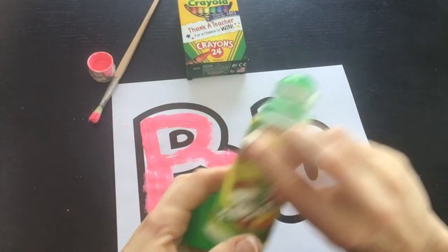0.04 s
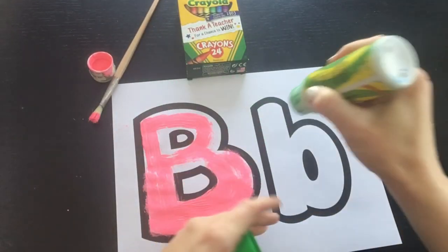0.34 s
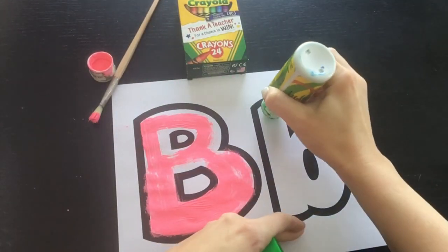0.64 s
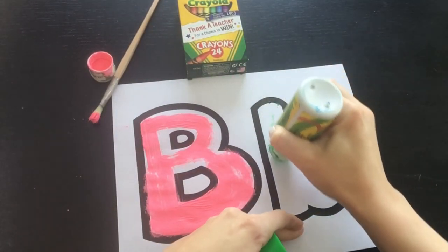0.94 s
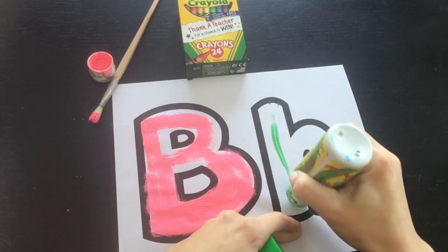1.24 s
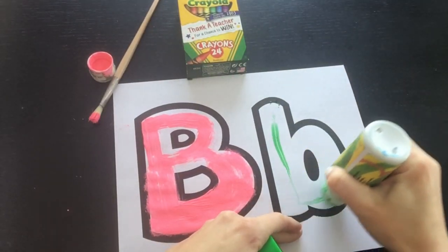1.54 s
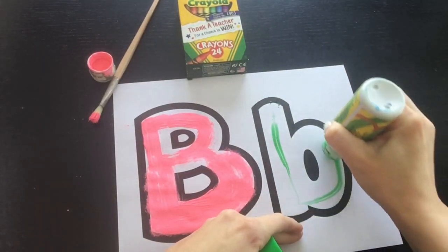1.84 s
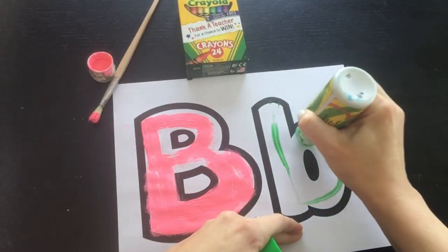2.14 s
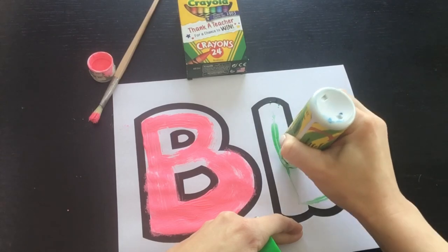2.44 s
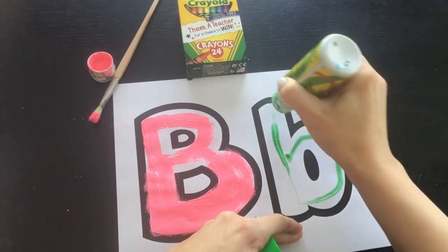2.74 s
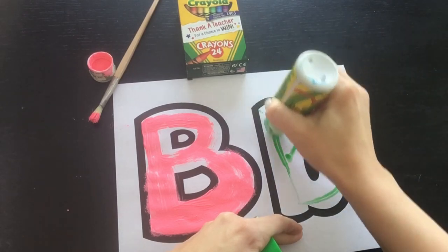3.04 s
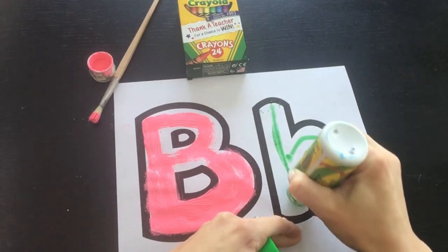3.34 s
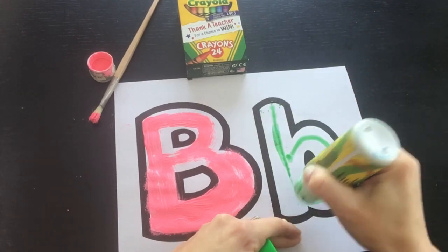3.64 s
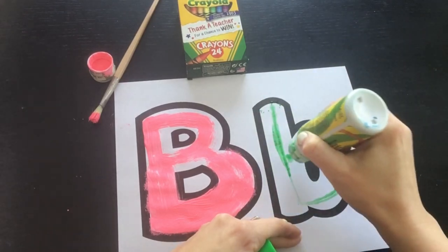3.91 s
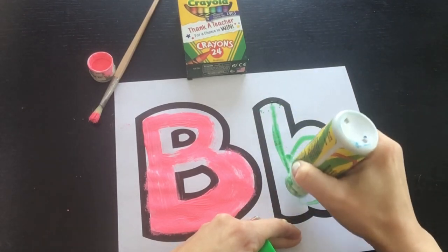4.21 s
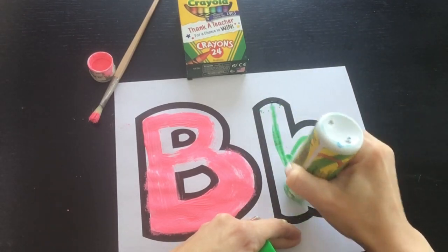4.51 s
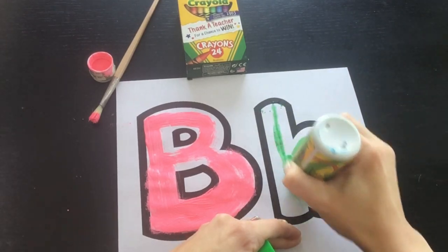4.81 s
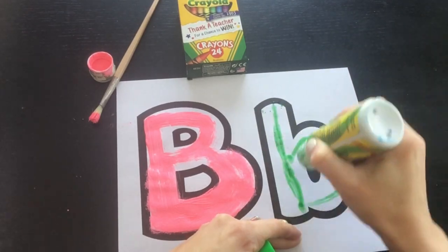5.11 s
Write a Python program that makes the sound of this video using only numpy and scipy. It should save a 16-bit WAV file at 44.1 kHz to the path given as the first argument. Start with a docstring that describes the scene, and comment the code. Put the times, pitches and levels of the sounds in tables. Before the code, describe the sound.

Fingers rub and click on a plastic paint bottle, then its roller tip knocks sharply on paper lying on a table. The tip is drawn along in soft, hissing, rasping strokes, with brief squeaks and small wet smacks as it lifts. Two more knocks come between the strokes, each ringing briefly through bottle and tabletop. It all sounds close, in a small room with a low hum.

```python
"""A paint bottle with a roller tip is knocked three times on paper on a table and drawn along in strokes. Each
knock makes the bottle and table ring. In the strokes, paper fibres catch on the tip: the paper hisses and
rasps, the hollow tip rings near 1 kHz and the tabletop drums faintly. The tip squeaks as it sticks and slips,
and its wet paint smacks as it lifts. At the start, fingers rub the bottle as they turn it over. Plastic, paper
and the wet tip click now and then, all in a small room with a low hum."""
import sys
import numpy as np
from scipy import signal
from scipy.fft import rfft, irfft
from scipy.io import wavfile

SR = 44100
rng = np.random.default_rng(int(sys.argv[2]) if len(sys.argv) > 2 else 0)


def log_audio(samples):
    """Write samples as a 16-bit WAV file to the path given in sys.argv[1]."""
    # one column per channel
    frames = np.atleast_2d(samples).T
    # limit to full scale, then quantise
    limited = np.clip(frames, -1, 1)
    pcm = np.round(limited * 32767).astype(np.int16)
    wavfile.write(sys.argv[1], SR, pcm)


N = 236442
TIME = np.arange(N) / SR


def from_db(db):
    """Turns decibels into a factor to multiply a sound by."""
    return 10 ** (np.asarray(db) / 20)


def rms_one(x):
    """Scales a sound to an average strength (rms) of 1."""
    return x / np.sqrt(np.mean(x ** 2) + 1e-20)


def at_hz(points, hz):
    """Reads between the rows of a table, giving each octave equal space."""
    known_hz, values = np.transpose(points)
    return np.interp(np.log(np.maximum(hz, 1)), np.log(known_hz), values)


def butter(x, hz, kind, order=2):
    """A filter that keeps the lows, the highs or a band."""
    sections = signal.butter(order, np.minimum(hz, SR / 2 - 100), kind, fs=SR, output="sos")
    return signal.sosfilt(sections, x + 1e-18)


def colour(x, spectrum):
    """Shapes a sound's bass and treble from rows of (pitch_hz, level_db); strength 1."""
    gains = from_db(at_hz(spectrum, np.arange(N // 2 + 1) * SR / N))
    return rms_one(irfft(rfft(x) * gains, N))


def drift(rate_hz):
    """A smooth random wander of strength 1."""
    return rms_one(butter(rng.standard_normal(N + SR), rate_hz, "low")[SR:])


def resonance(x, hz, width_hz):
    """Lets through what lies near one pitch and weakens the rest."""
    r = np.exp(-np.pi * width_hz / SR)
    feedback = [1, -2 * r * np.cos(2 * np.pi * hz / SR), r * r]
    return signal.lfilter(np.array([1, 0, -1]) * (1 - r * r) / 2, feedback, x)


def gliding_band(centre_hz, width_hz):
    """Noise gathered around a pitch that can move; strength 1."""
    a, b = butter(rng.standard_normal((2, len(centre_hz))), width_hz / 2, "low")
    phase = 2 * np.pi * np.cumsum(centre_hz) / SR
    return rms_one(a * np.cos(phase) + b * np.sin(phase))


def fibres(per_s, spread_db):
    """Tiny slips over a rough surface: random clicks of uneven size."""
    return (rng.random(N) < per_s / SR) * rng.standard_normal(N) * from_db(spread_db * drift(250))


def shifting(x, spread_db, rate_hz):
    """The changing gap between hand, tip and paper lets narrow bands swell and fade, each on its own."""
    spectrum, hz = rfft(x), np.arange(N // 2 + 1) * SR / N
    centres = np.linspace(0, 16000, 25)
    shares = (np.maximum(1 - np.abs(hz - centre) / centres[1], 0) for centre in centres)
    bands = (irfft(spectrum * share, N) for share in shares)
    return rms_one(sum(band * from_db(spread_db * drift(rate_hz)) for band in bands))


def swell(length_s):
    """A rounded rise and fall."""
    return np.sqrt(np.hanning(int(length_s * SR)))


def humps(rows):
    """A level that swells and fades once for each row of (middle_s, length_s, level_db)."""
    return sum(from_db(db) * np.exp(-(2 * (TIME - s) / length) ** 2) for s, length, db in rows)


def add(out, s, sound):
    """Mixes a sound in, starting at s seconds."""
    start = int(round(s * SR))
    out[start:start + len(sound)] += sound[:N - start]


def background(air_db=-50.5, draught_db=-39.5, draught_hz=6.5):
    """Room air, mains hum and a slow draught on the microphone."""
    # the tones of the hum: pitch_hz, level_db
    hum_tones = [(60, -68.5), (120, -70)]
    # the soft rush of the air: pitch_hz, level_db
    air_spectrum = [(10, 5.5), (34, 3.5), (50, -8), (85, -13.5), (160, -26.5), (200, -16), (260, -25),
                    (340, -17.5), (500, -27), (800, -30), (2000, -42.5), (4000, -46), (9500, -46),
                    (15700, -59.5)]
    hum = sum(np.sqrt(2) * from_db(db) * np.sin(2 * np.pi * hz * TIME) for hz, db in hum_tones)
    draught = from_db(draught_db) * rms_one(butter(drift(draught_hz), 20, "low"))
    return from_db(air_db) * colour(rng.standard_normal(N), air_spectrum) + hum + draught


def room(x, delay_s=0.0046):
    """The room sends back dense echoes that last longest in the bass."""
    # how long the room rings: pitch_hz, decay_s (here and below, the time to fall by 60 dB)
    decay_times = [(150, 0.6), (500, .36), (1200, .34), (2500, 0.41), (5000, 0.14), (10000, 0.35)]
    t = TIME[:SR * 3 // 4]
    edges_hz = np.geomspace(90, 16000, 9)
    echoes = np.zeros(len(t))
    for low, high in zip(edges_hz, edges_hz[1:]):
        band = butter(rng.standard_normal(len(t)), [low, high], "band")
        echoes += band * from_db(-60 * t / at_hz(decay_times, np.sqrt(low * high)))
    echoes *= t > delay_s
    return signal.fftconvolve(x, echoes / np.sqrt(np.sum(echoes ** 2)))[:N]


def holding_hand(pitch_hz=620, width_hz=550):
    """The side of the free hand brushes dully on to the paper to hold it."""
    # the hand's slide: middle_s, length_s, level_db
    slides = [(0.58, 0.15, -56.5)]
    return humps(slides) * gliding_band(np.full(N, pitch_hz), width_hz)


def grip(gain_db=1.5):
    """Skin brushes over the plastic as the bottle is turned."""
    # short rubs of the fingers: middle_s, length_s, level_db
    rubs = [(0.0, 0.037, -61), (0.11, 0.14, -66), (0.215, 0.056, -62), (0.325, 0.12, -64.5),
            (0.42, 0.077, -55.5), (0.575, 0.19, -62)]
    # skin on plastic: pitch_hz, level_db
    skin_spectrum = [(1200, -17), (3400, -11.5), (5000, -9), (6800, -10), (8700, -9.5), (10200, -10),
                     (11300, -23.5), (15700, -37.5)]
    rustle = colour(fibres(per_s=13000, spread_db=1.0), skin_spectrum)
    return from_db(gain_db) * humps(rubs) * shifting(rustle, spread_db=4.0, rate_hz=3.5)


def ticks(gain_db=-2.5, decay_s=0.01, width_share=0.95):
    """Plastic and paper snap, and the wet tip ticks as it leaves the paper: each click is a broad burst of
    noise that dies quickly."""
    # the clicks: start_s, level_db, pitch_hz
    clicks = [(0.170, -47, 4500), (0.194, -52, 3500), (0.269, -47, 10500), (0.2785, -38.5, 6900),
              (0.3235, -41, 6840), (0.3320, -36, 5700), (0.3936, -36.5, 3280), (0.467, -42, 4800),
              (0.7014, -28.5, 2000), (0.955, -41, 5660), (1.44, -51, 4500), (1.92, -42, 1000),
              (4.221, -55.5, 9450), (5.077, -53, 6900)]
    out, t = np.zeros(N), TIME[:SR // 8]
    for s, db, hz in clicks:
        width_hz = width_share * hz
        burst = resonance(rng.standard_normal(len(t)), hz, width_hz)
        burst = rms_one(butter(burst, hz + width_hz, "low"))   # a softer contact has less treble
        add(out, s, burst * from_db(gain_db + db - 60 * t / decay_s))
    return out


def squeaks(base_width_hz=120, width_share=0.1):
    """The tip sticks and slips, making brief rough whistles that swell and glide."""
    # the whistles: start_s, length_s, start_hz, end_hz, level_db
    whistles = [(0.403, 0.026, 4900, 4380, -45.5), (1.453, 0.16, 2650, 3050, -59.5),
                (1.589, 0.086, 4050, 4260, -49), (1.651, 0.045, 929, 580, -51),
                (1.677, 0.055, 662, 958, -53), (1.711, 0.1, 4300, 4530, -53.5),
                (1.82, 0.072, 4400, 4500, -49.5), (2.086, 0.18, 2955, 2760, -62.5),
                (2.936, 0.062, 5950, 5550, -57), (3.148, 0.11, 6040, 5760, -54),
                (3.185, 0.33, 3480, 4705, -54.5), (4.563, .08, 6660, 6640, -64),
                (4.656, 0.066, 3850, 4150, -55), (4.553, .08, 2620, 2620, -61),
                (4.672, .05, 2900, 2780, -59), (4.791, .022, 928, 1004, -55), (4.80, 0.19, 2650, 2600, -60),
                (4.83, .13, 4200, 4050, -58)]
    out = np.zeros(N)
    for s, length, start_hz, end_hz, db in whistles:
        shape = swell(length)
        pitch_hz = np.linspace(start_hz, end_hz, len(shape))
        width_hz = base_width_hz + width_share * start_hz
        add(out, s, from_db(db) * shape * gliding_band(pitch_hz, width_hz))
    return out


def lifts(peel_s=0.034, let_go_s=0.0345, smack_decay_s=0.02, smack_top_hz=4500, pop_hz=362, pop_s=0.09):
    """Sticky paint peels, then parts with a duller smack and a soft low pop."""
    # the tip leaves the paper: time_s, peel_db, smack_db, pop_db
    lift_offs = [(2.578, -57, -42, -53), (3.639, -48.5, -43, -55), (5.043, -55.5, -64.5, -64)]
    # wet paint parting: pitch_hz, level_db
    wet_spectrum = [(200, -15.5), (500, -7.5), (850, 3), (1300, -10.5), (1900, -15.5), (2600, -8.5),
                    (3200, -23.5), (4400, -10), (6000, -22.5), (10000, -24), (15700, -50)]
    peel_level, smack_level, pop_level = np.zeros((3, N))
    t = TIME[:SR // 4]
    for s, peel_db, smack_db, pop_db in lift_offs:
        add(peel_level, s - peel_s / 4, from_db(peel_db) * swell(peel_s))
        add(smack_level, s + let_go_s, from_db(smack_db - 60 * t / smack_decay_s))
        add(pop_level, s - peel_s / 4, from_db(pop_db) * swell(pop_s))
    wet = colour(rng.standard_normal(N), wet_spectrum)
    smacks = butter(smack_level * wet, smack_top_hz, "low", order=1)
    pops = pop_level * gliding_band(np.full(N, pop_hz), width_hz=190)
    return peel_level * wet + smacks + pops


def table_drumming(level):
    """The tip's tiny slips shake the tabletop, harder where the tip judders."""
    # the judders: middle_s, length_s, level_db
    judders = [(1.03, 0.039, -57), (1.68, .05, -59.5), (3.21, 0.056, -55.5), (4.638, 0.028, -48),
               (4.9, 0.074, -52)]
    # the tabletop's low rumble: pitch_hz, level_db
    table_spectrum = [(70, -26.5), (130, 4.5), (200, -6.5), (300, 2), (450, -4), (620, -6.5), (850, -11),
                      (1400, -14.5), (3000, -38)]
    return (level + humps(judders)) * colour(fibres(per_s=3000, spread_db=1.5), table_spectrum)


def paper_hiss():
    """Paper fibres catch on the tip so often that their clicks blur into a hiss."""
    # rubbed paper: pitch_hz, level_db
    paper_spectrum = [(900, -15), (1400, -4), (1950, -10.5), (2250, -3), (2600, 0.5), (3300, -4), (4200, 0),
                      (5700, -4), (7500, -5.5), (10000, -9.5), (12000, -19.5), (15700, -34)]
    hiss = colour(fibres(per_s=14000, spread_db=-0.6), paper_spectrum)
    return shifting(hiss, spread_db=2.6, rate_hz=5)


def tip_ring(harder_db, pitch_hz=1051, hz_per_db=4, wander_hz=32, width_hz=155, halo_db=-7.0):
    """The hollow tip rings in a wider halo of noise; its pitch wanders and rises with pressure."""
    ring_hz = pitch_hz + hz_per_db * harder_db + wander_hz * drift(9.2)
    return gliding_band(ring_hz, width_hz) + from_db(halo_db) * gliding_band(ring_hz, 5 * width_hz)


def strokes(hiss_db=7.5, tip_db=-0.5, fade_s=0.011, tremble_db=0.73):
    """The tip crosses the paper: speed drives the hiss and rasp, pressure shakes the tip and table."""
    # the hand's movement, one list per stroke: time_s, speed_db, pressure_db (both as sound levels)
    hand_moves = [
        [(0.79, -81, -52.5), (0.812, -64, -52.5), (0.912, -68, -59), (0.99, -65.5, -48.5), (1.016, -67.5, -51),
         (1.174, -63, -51), (1.244, -70.5, -60), (1.358, -71.5, -60.5), (1.42, -84, -70)],
        [(1.44, -73, -75), (1.604, -59, -55), (1.708, -67, -61), (1.738, -66.5, -50.5), (1.812, -65.5, -55),
         (1.872, -67.5, -47.5), (1.898, -66, -60.5), (1.96, -66.5, -54.5), (2.06, -72.5, -65)],
        [(2.08, -73.5, -65.5), (2.124, -69, -65), (2.196, -69.5, -60), (2.246, -71.5, -63.5),
         (2.368, -66.5, -53), (2.392, -62, -55), (2.424, -65.5, -55.5), (2.474, -92, -72.5), (2.48, -96, -72)],
        [(3.01, -73, -52), (3.05, -62.5, -51), (3.17, -62, -53.5), (3.228, -60, -48), (3.378, -64, -58),
         (3.396, -63.5, -55), (3.47, -74.5, -64), (3.496, -70.5, -57.5), (3.6, -87.5, -82)],
        [(4.48, -77, -50.5), (4.498, -67, -55.5), (4.6, -61, -52.5), (4.646, -64, -58.5), (4.66, -61, -52.5),
         (4.676, -61.5, -55.5), (4.716, -75, -53), (4.736, -85, -71), (4.76, -88, -71.5)],
        [(4.797, -68, -54), (4.805, -63, -54.5), (4.819, -66, -53), (4.893, -62, -58), (4.951, -64.5, -53.5),
         (4.965, -68, -57.5), (5.02, -94, -72)],
    ]
    # what the tip's tilt gives in each stroke at usual speed and pressure: rasp_db, drum_db, rasp_hz
    tilts = [(-59, -60, 4900), (-61, -59, 4200), (-64, -61.5, 4200), (-60, -58, 4300), (-71, -53, 4400),
             (-64, -61, 4100)]
    usual_speed_db, usual_pressure_db = -63, -52
    rasp_follows, drum_follows = 1.03, 0.77   # dB gained per dB of speed, and of pressure
    times, speeds, pressures = np.vstack(hand_moves).T
    speed_db, pressure_db = np.interp(TIME, times, speeds), np.interp(TIME, times, pressures)
    faster_db, harder_db = speed_db - usual_speed_db, pressure_db - usual_pressure_db
    hiss_level, tip_level, drum_level, rasp = np.zeros((4, N))
    for move, (rasp_db, drum_db, rasp_hz) in zip(hand_moves, tilts):
        start_s, end_s = move[0][0], move[-1][0]
        contact = np.clip(np.minimum(TIME - start_s, end_s - TIME) / fade_s + 1, 0, 1)
        hiss_level += contact * from_db(hiss_db + speed_db)
        tip_level += contact * from_db(tip_db + pressure_db)
        drum_level += contact * from_db(drum_db + drum_follows * harder_db)
        rasp_level = contact * from_db(rasp_db + rasp_follows * faster_db)
        rasp += rasp_level * gliding_band(np.full(N, rasp_hz), width_hz=1100)
    sound = table_drumming(drum_level) + hiss_level * paper_hiss() + tip_level * tip_ring(harder_db)
    return (sound + rasp) * from_db(tremble_db * drift(38))   # the hand trembles


def knock_echo(crack, edge_hz, treble_db):
    """The room answers a knock; the treble above edge_hz comes back weaker."""
    echo = butter(room(crack), 120, "high")
    echo = butter(echo, 8500, "low", order=3)
    dull, bright = butter(echo, edge_hz, "low", order=3), butter(echo, edge_hz, "high", order=3)
    return dull + from_db(treble_db) * bright


def knocks(rise_s=0.00024, crack_s=0.00076, smack_decay_s=0.0093, click_db=11.0, ring_share_db=-5.5):
    """Each blow makes table and bottle ring; the wet tip smacks flat just after, and the room echoes."""
    # the tip hits the table: start_s, ring_db, echo_db, edge_hz, treble_db, smack_delay_s, smack_db
    blows = [(0.6713, 2, -1, 2380, -10, .0035, -24.5), (2.9272, 3.5, -3, 2600, -7.5, 0.0027, -20.5),
             (4.3934, -1, 1.5, 1710, -19, 0.00099, -28)]
    # natural tones of table and bottle, whose strengths depend on the spot struck:
    # pitch_hz, decay_s, first_knock_db, second_knock_db, third_knock_db
    tones = [(89, 0.043, -29, -57.5, -26), (135.2, 0.65, -44, -45.5, -43.5), (157, 0.75, -47, -45.5, -37.5),
             (194.3, 0.45, -41.5, -39, -30), (276, 0.32, -54, -44, -51.5), (363, 0.35, -36.5, -45.5, -26.5),
             (423, .25, -41, -50.5, -29), (595, .25, -56, -39, -28), (189, 0.01, -31, -17, -18),
             (435, .02, -22.5, -30.5, -10), (518, 0.035, -22.5, -22.5, -13.5),
             (611, 0.018, -15.5, -35, -15.5), (847, .018, -17, -16.5, -12), (1170, 0.011, -17.5, -17, -11),
             (1400, 0.022, -23, -16, -25), (1592, 0.021, -18, -24, -19), (2055, .016, -24.5, -19, -39),
             (2474, 0.018, -23, -28, -26.5), (3560, 0.015, -28, -39, -27), (4460, 0.0093, -47.5, -19, -21),
             (6900, 0.0099, -59, -37, -58), (9000, 0.0095, -34, -34.5, -35)]
    out, t = np.zeros(N), TIME[:SR // 2]
    click = from_db(click_db) * butter(1.0 * (t == 0), 1300, "low", order=1)
    for blow, (s, ring_db, echo_db, edge_hz, treble_db, delay_s, smack_db) in enumerate(blows):
        ring = sum((-1) ** tone * from_db(db[blow] - 60 * t / decay_s) * np.sin(2 * np.pi * hz * t)
                   for tone, (hz, decay_s, *db) in enumerate(tones))
        ring *= 1 - np.exp(-t / rise_s)
        add(out, s, from_db(ring_db) * ring)
        smack = rms_one(butter(rng.standard_normal(len(t)), [400, 5500], "band"))
        smack *= from_db(smack_db - 60 * t / smack_decay_s)
        add(out, s + delay_s, butter(smack, 12500, "low", order=4))
        # the whole tabletop sends one broad click into the room, with the first instant of the ring
        crack = np.zeros(N)
        add(crack, s, click)
        add(crack, s + delay_s, from_db(ring_share_db) * ring * np.exp(-t / crack_s))
        out += from_db(echo_db) * knock_echo(crack, edge_hz, treble_db)
    return out


def scene(room_db=-11.5):
    """Knocks, strokes and small handling sounds in the room, on one channel."""
    quiet_sounds = strokes() + grip() + holding_hand() + ticks() + squeaks() + lifts()
    return (knocks() + quiet_sounds + from_db(room_db) * room(quiet_sounds) + background())[None]


def record(dry, cutoff_hz=15800):
    """Cuts off the highest treble steeply."""
    return signal.sosfilt(signal.ellip(10, .1, 70, cutoff_hz, fs=SR, output="sos"), dry)


dry = scene()
out = record(dry)
log_audio(out)
```